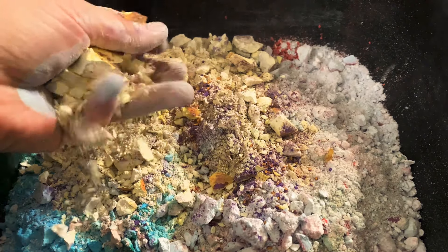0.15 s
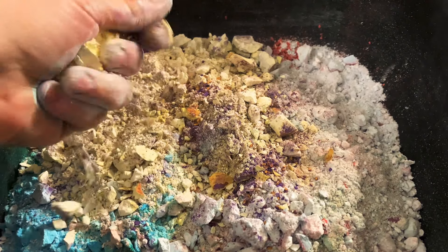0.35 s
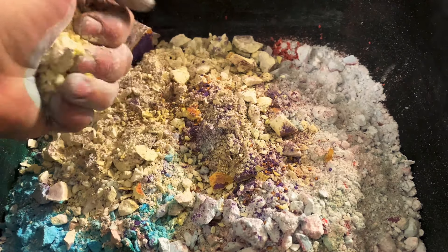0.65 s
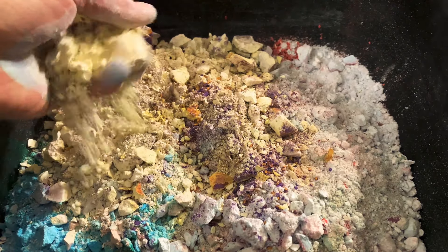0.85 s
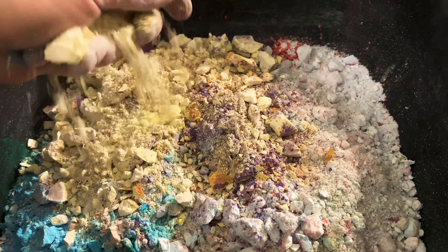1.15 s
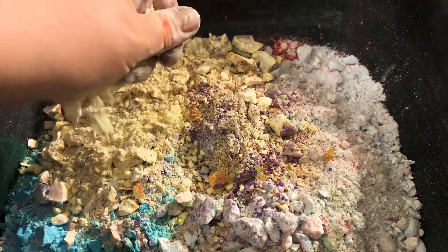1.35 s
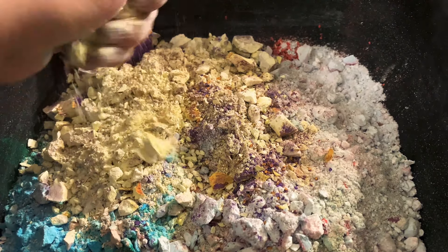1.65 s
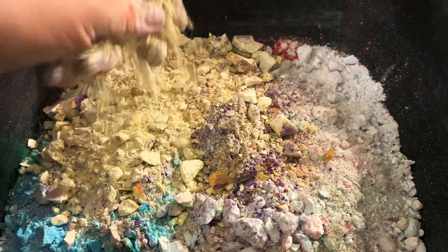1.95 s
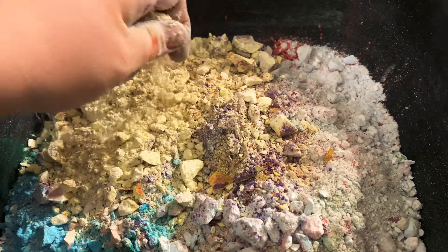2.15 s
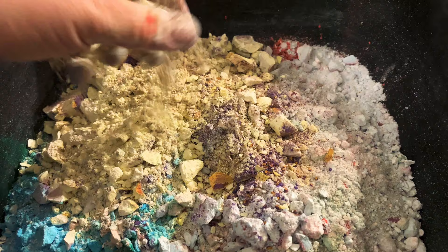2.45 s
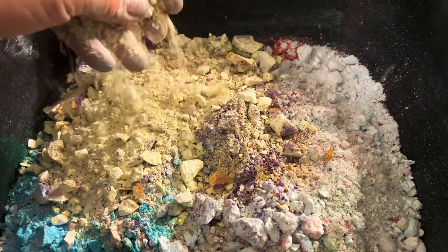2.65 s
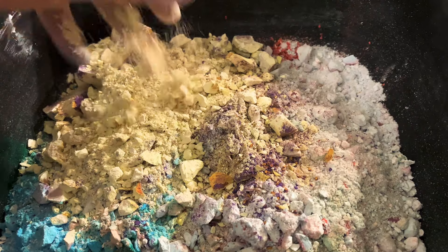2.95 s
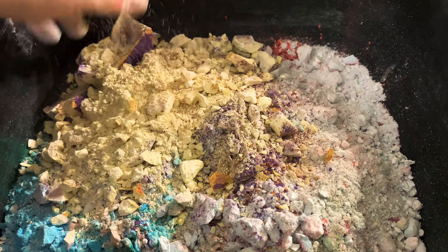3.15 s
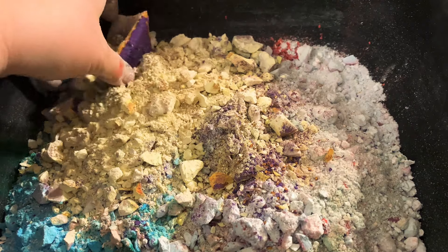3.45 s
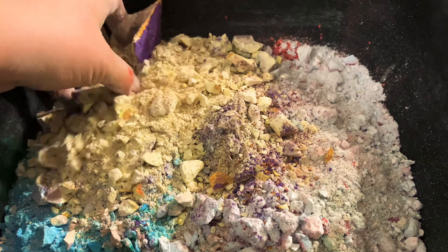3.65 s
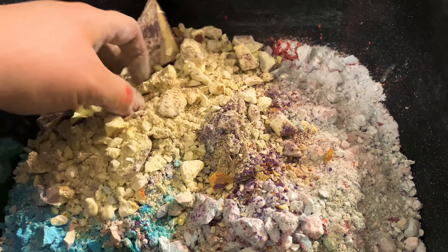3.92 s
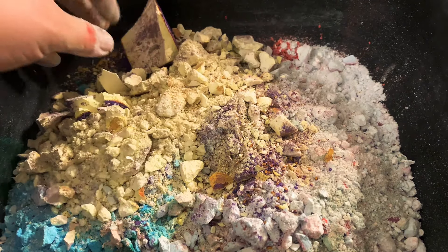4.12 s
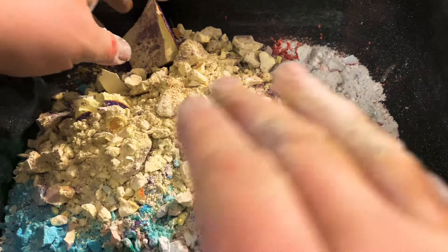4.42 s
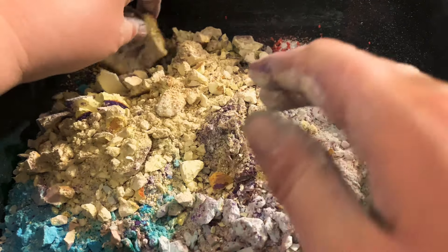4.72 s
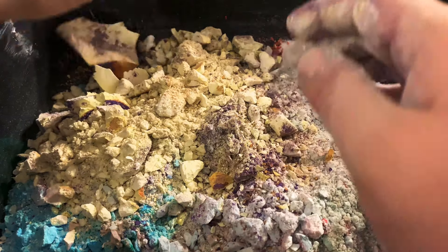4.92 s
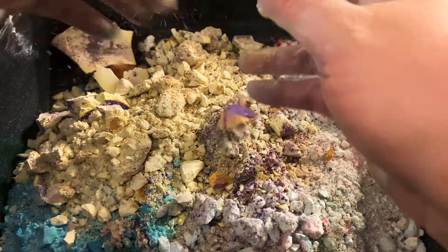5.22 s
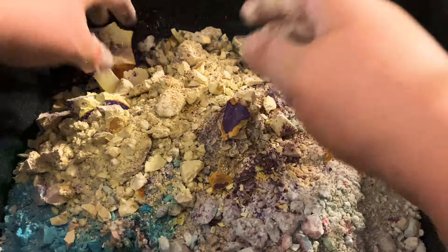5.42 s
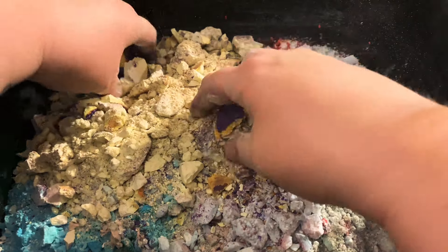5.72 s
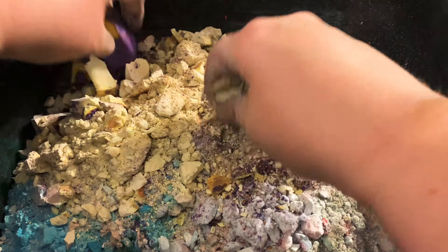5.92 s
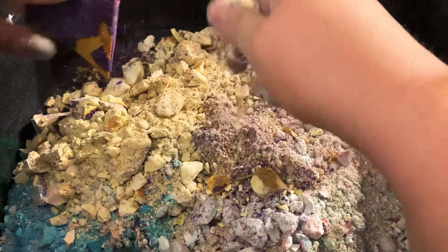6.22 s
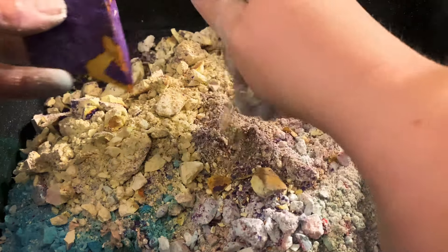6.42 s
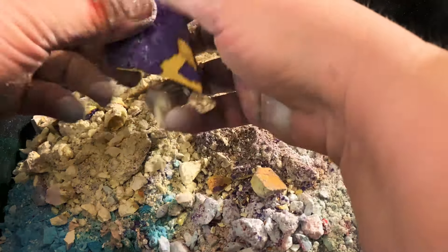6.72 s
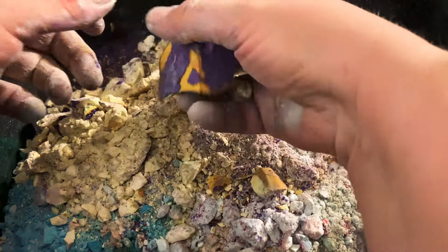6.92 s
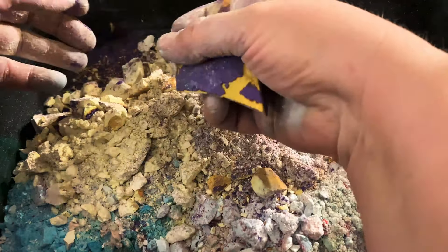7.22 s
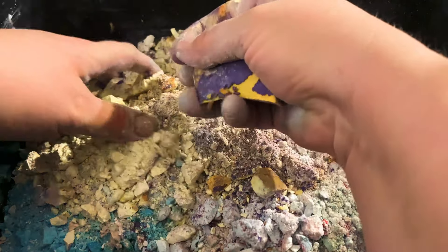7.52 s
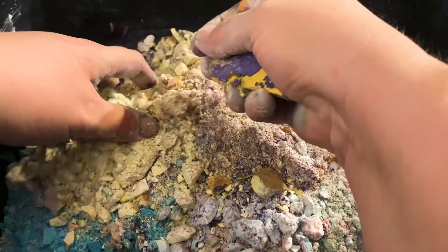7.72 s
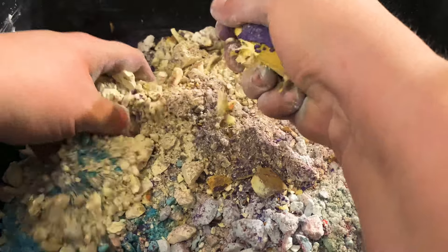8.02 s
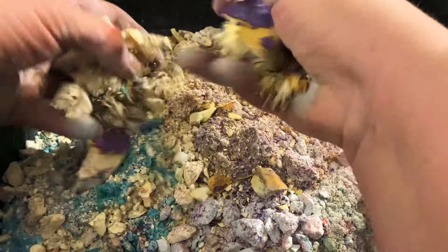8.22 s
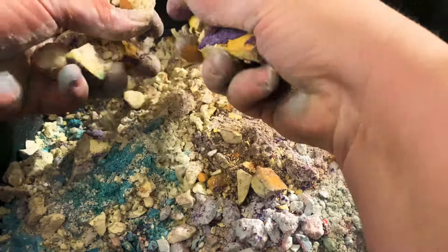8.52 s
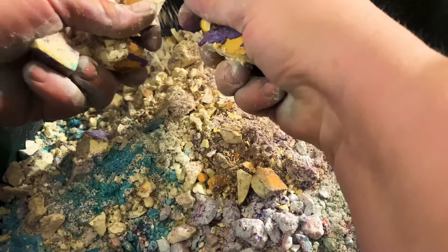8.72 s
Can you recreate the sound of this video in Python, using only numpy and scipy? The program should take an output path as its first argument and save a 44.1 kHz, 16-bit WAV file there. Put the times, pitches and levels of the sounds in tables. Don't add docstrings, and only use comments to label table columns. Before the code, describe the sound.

Two hands crush chalk over a heap of crumbs in a tray, heard very close and dry in stereo by a small recorder on the same table. Clusters of snaps and knocks alternate with softer gritty crumbling. Heavy thuds come near three and four seconds, then a quieter lull, scrapes, powder hiss and short squeaks, and finally hard breaking near the end. Low table rumble and faint mains hum lie beneath.

```python
import sys
import numpy as np
from scipy import signal
from scipy.fft import rfft, irfft, next_fast_len
from scipy.io import wavfile
from scipy.ndimage import uniform_filter1d, map_coordinates

SR = 44100
rng = np.random.default_rng(int(sys.argv[2]) if len(sys.argv) > 2 else 0)


def wrap_up_sound(samples):
    columns = np.atleast_2d(samples).T
    tamed = np.clip(columns, -1, 1)
    steps = np.round(tamed * 32767).astype(np.int16)
    wavfile.write(sys.argv[1], SR, steps)


def natural_amplitude(level_db):
    exponent = np.asarray(level_db, float) / 20
    return 10 ** exponent


N = 391166

# [f/Hz, level/dB rms]
MAINS_HUM = (119.8, -45)
# [f/Hz, likeness 0-1]
LIKENESS = [(30, 0.993), (70, 1), (150, 0.88), (290, 0.54), (640, 0.37), (3000, 0.56), (15000, 0.76)]

# [t/s, level/dB]
ROCKING = [
    (0, -27),
    (3.9, -28.5),
    (4.3, -10.5),
    (4.8, -16),
    (5.6, -23),
    (6.8, -18.5),
    (8.87, -21.5),
]
# [t/s, level/dB]
SHAKING = [(0, -23), (.5, -34.5), (1.45, -28), (1.95, -28), (2.4, -29.5), (3.255, -27.5), (3.27, -17),
           (3.95, -23), (4.55, -52), (4.65, -28.5), (5.44, -36), (5.47, -24.5), (6.0, -39.5), (6.9, -28.5),
           (7.35, -28), (7.58, -12), (7.69, -24.5), (8.87, -32.5)]
# [f/Hz, level/dB per Hz]
SWAY_COLOUR = [(1.5, -20), (4, 0.5), (16, -2), (26, -19), (70, -83)]
RUMBLE_COLOUR = [(15, -60), (28, -6.5), (42, -1.5), (80, -9), (110, -7.5), (200, -123)]
DRONE_COLOUR = [(50, -52), (80, -21), (110, -1.5), (145, -5), (190, -5), (250, -8.5), (325, -10.5),
                (430, -13), (700, -45.5)]
DRONE_DB, DRONE_DRAG = 1.9, 0.55

# [t/s, peak level/dB, f/Hz]
NUDGES = [(.255, -12.5, 89), (1.21, -17, 94), (1.326, -18, 127), (2.043, -13, 121), (3.044, -21, 105),
          (3.369, -13, 100), (3.66, -12, 60), (3.75, -15, 81), (4.073, -21, 67), (4.157, -19, 199),
          (5.432, -9.5, 120), (5.569, -11, 110), (6.07, -13.5, 50), (6.341, -14.5, 51.5), (6.537, -21, 94),
          (6.6, -19.5, 129.8), (6.79, -11, 65), (7.033, -11, 95.5), (7.069, -14, 84), (7.16, -15, 190),
          (7.511, -5, 101), (7.82, -10, 45), (7.955, -9, 70), (7.98, -13, 55), (8.085, -16, 60),
          (8.181, -17, 190), (8.214, -16, 200), (8.303, -16.5, 75), (8.457, -14, 132), (8.619, -8.5, 65.5)]
NUDGE_LAG_S, NUDGE_CYCLES = 0.00726, 4.2
# [t/s, peak level/dB, low mode level/dB, high mode level/dB, ringing 0-1.5]
LANDINGS = [(0.232, -12, -20, -0.5, 0.74), (1.415, -9.5, -9, -13, 0.28), (1.513, -8.5, -12, 14.5, 0.12),
            (1.671, -1.5, -19, 0, 0.22), (1.775, -9, -13, -21, 0.28), (2.927, -14.5, -22, -1, 0.53),
            (3.264, 4.5, -12, -20, 0.9), (3.471, -7.5, -9, -9, 1), (3.823, -2, -10, -14, 0.93),
            (3.931, 11.5, -22, -8, 0.86), (4.611, -12.5, -11, -12, 0.5), (4.74, -15, -5, 12, 0.31),
            (4.855, -1.5, -32, -12, 0.54), (4.885, -1, -12, 5.5, 1), (4.985, 1.5, -9, 0, 0.75),
            (5.461, 6, -9.5, -17, 0.86), (5.885, -13.5, 3, 16, 0.13), (6.846, -2.5, -16.5, -8, 0.57),
            (7.476, -11.5, -7, -7, 1), (7.572, -20, 2, -7, 0.85), (7.767, -13, -1.5, 10, 0.44),
            (8.702, -28, -24, -12, 0.3)]
# [f/Hz, time to fall 60 dB t/s]
TRAY_MODES = [(108, 0.23), (190, 0.12), (325, 0.06), (470, 0.061)]

# [t/s, length t/s, centre f/Hz, level/dB rms]
SIFTING = [(0.34, .07, 6000, -34), (0.45, 0.14, 4100, -35), (3.54, .04, 2900, -28), (5.647, .05, 6200, -38),
           (5.8, 0.062, 5200, -36), (6.612, .07, 5800, -39.5), (6.624, 0.055, 4600, -40),
           (8.7, .05, 5900, -33), (6.85, 0.042, 11600, -35), (6.902, .095, 7000, -27.5),
           (6.9, .095, 17000, -33), (6.1, 0.061, 6500, -42), (7.151, .05, 5700, -32),
           (7.246, 0.045, 5800, -28.5), (7.238, 0.22, 14500, -30), (7.299, 0.1, 3400, -34.5),
           (7.2, .235, 1100, -31.5), (8.43, .14, 15000, -40), (7.62, 0.12, 1300, -36.5),
           (7.3, 0.15, 520, -29)]
# [t/s, length t/s, first f/Hz, last f/Hz, level/dB rms]
SQUEAK_STROKES = [(0.47, 0.09, 4400, 4140, -44), (6.7, .04, 6840, 6600, -31),
                  (6.75, 0.055, 3030, 3330, -34), (6.86, .024, 6260, 6230, -22),
                  (6.862, 0.022, 2500, 2490, -34), (6.912, .08, 3590, 3660, -36),
                  (6.914, 0.065, 2470, 2330, -33), (6.9, 0.096, 6400, 7250, -32),
                  (7.059, 0.039, 4140, 4270, -38), (7.06, 0.088, 8200, 8150, -42),
                  (6.62, .06, 7000, 6700, -44), (6.99, 0.2, 5830, 5620, -44)]
# [t/s, length t/s, first f/Hz, last f/Hz, level/dB rms]
SCRAPE_STROKES = [
    (6.013, 0.18, 2040, 1950, -34),
    (6.195, 0.15, 2070, 1700, -35),
    (6.342, 0.11, 1700, 2100, -34.5),
]
SIFT_WIDTH, SQUEAK_WIDTH, SCRAPE_WIDTH = 0.22, 0.04, 0.11
STUTTER_DB = 3.5

# [t/s, bits per s]
CRUMBLING_RATE = [(0, 130), (.45, 100), (.5, 50), (.8, 80), (.9, 200), (3.05, 180), (3.3, 280), (4.9, 60),
                  (5.5, 280), (6.7, 150), (7.7, 220)]
# [t/s, effort level/dB, coarseness level/dB]
STEADY_WORK = [(0, -38, -2), (.19, -41.5, 2), (.38, -33, 0.5), (.83, -43.5, 2), (1.2, -40.5, 1.5),
               (1.35, -35.5, 0.5), (1.7, -41, 3), (2.8, -45.5, 0), (3.24, -61, 10), (3.4, -38, 9),
               (3.8, -33.5, 9.5), (4.0, -54, 8.5), (4.52, -60.5, 2.5), (4.66, -39, 0.5), (5.43, -53, 5),
               (5.47, -32.5, 5), (6.82, -40.5, -1.5), (8.87, -39.5, 3.5)]
# [t/s, half length t/s, depth level/dB]
PAUSES = [
    (6.825, .035, -6.5),
    (7.03, 0.04, -8),
    (5.08, 0.14, -9.5),
    (1.66, 0.042, -6.5),
    (6.2, .04, -4),
]
# [t/s, hold t/s, effort level/dB, coarseness level/dB]
PRESSES = [(.245, 0.14, -37.5, 3), (2.05, 0.096, -31.5, -3), (2.26, 0.079, -34, -11),
           (2.65, 0.032, -40, 3.5), (2.94, 0.1, -48, 8.5), (3.264, 0.046, -28.5, 11.5),
           (3.37, 0.025, -28.5, 7.5), (3.467, 0.014, -30.5, 8.5), (3.94, 0.0092, -49.5, 20),
           (4.088, 0.0065, -40.5, 6), (4.617, 0.011, -37, 15.5), (4.89, 0.0064, -56, 22),
           (4.945, 0.0046, -48, 14.5), (5.45, 0.012, -33, 9.5), (6.847, 0.0063, -30, 4),
           (7.162, 0.27, -31, 0.5), (7.515, 0.0061, -35, 7.5), (7.77, 0.18, -37, 1),
           (8.08, 0.058, -49.5, 18), (8.388, 0.014, -33.5, 3), (8.615, 0.022, -28, 0.5)]
# [t/s, hold t/s, effort level/dB, coarseness level/dB]
RAKING = [(1.42, 0.13, -35, 2.5), (1.88, 0.044, -42.5, 3), (2.41, 0.0077, -35, -21),
          (2.86, 0.006, -39.5, -25), (3.565, 0.005, -28, -18), (3.74, 0.029, -27, 5),
          (4.17, 0.056, -38.5, 4), (4.75, 0.064, -43.5, 11), (5.12, 0.016, -47.5, -30),
          (5.67, 0.011, -24.5, -1), (5.76, 0.05, -38, 13), (6.09, 0.022, -34, -5), (6.208, 0.023, -26, -12),
          (6.42, 0.0072, -30, -25), (6.63, 0.13, -40, -4), (6.92, 0.055, -32, -31),
          (7.075, 0.013, -38.5, -25), (7.59, 0.0088, -46, 4), (7.72, 0.061, -43, 12),
          (8.205, 0.017, -32, -5), (8.47, 0.082, -27, -13), (8.83, 0.045, -45, -2)]
PRESS_RISE, PRESS_FALL, RAKE_RISE, RAKE_FALL = 3700, 420, 420, 540
CRUMBS_DB, CRUMBS_GAIN, POWDER_DB, POWDER_LOSS = 1.12, 1.07, -0.5, 0.19
# [f/Hz, level/dB per Hz]
CRUMBS_COLOUR = [(250, -120), (330, -10.5), (480, 1), (700, -2), (850, 4.5), (1050, -5.5), (1500, -7),
                 (2200, -13.5), (4000, -50)]
GRIT_COLOUR = [(700, -53), (1100, -10), (1600, -10.5), (3000, -8), (5500, -12.5), (7500, -70), (12000, -60)]
POWDER_COLOUR = [(2500, -43), (4200, -15), (5800, -6), (9000, -7), (16000, -14)]

# [t/s, peak level/dB, f/Hz]
FLYING_CHIPS = [(0.242, -7, 870), (0.263, -4, 1260), (1.068, -7.5, 797), (1.229, -16, 795),
                (1.284, -11, 947), (1.345, -12, 2730), (1.358, -10, 1290), (1.381, -7, 650),
                (2.046, -4, 1410), (2.063, -0.5, 1420), (2.257, 0.5, 1530), (2.286, -12, 1380),
                (3.871, -5, 760), (3.893, -1.5, 780), (4.857, -1.5, 840), (4.884, 3, 786),
                (6.074, -3, 1790), (7.574, 8, 2700), (7.595, -5, 2190), (7.77, -1, 580), (7.821, -4, 883),
                (7.867, 2, 1850), (8.073, -4, 1860), (8.102, -13.5, 812.5), (8.126, -11, 805),
                (8.393, 0.5, 930), (8.593, 1, 1330), (8.62, -1, 1370)]
CHIP_DB, CHIP_CYCLES = -6, 19
# [t/s, peak level/dB, dull part level/dB]
SMALL_CRACKS = [(0.0438, -21, -2), (0.081, -14.5, -3), (0.1186, -25, -2), (0.1585, -22, -5),
                (0.2089, -18, -4), (0.2952, -17, -5), (0.3795, -20, -4), (0.4823, -21, -3),
                (0.7472, -19, 1), (0.836, -24, -4), (0.959, -19, -3), (1.1937, -31, -4), (1.2086, -14, -4),
                (1.256, -15, -4), (1.8063, -26, -4), (1.8417, -24, -4), (1.8806, -24, -4),
                (1.8976, -16.5, -4), (2.4992, -25, -4), (2.585, -16, -2), (2.6356, -18.5, -4),
                (2.7202, -21, -6), (2.913, -16, -3), (2.9585, -15, -4), (3.043, -19, 0), (3.2742, -6, -2),
                (3.3164, -15, -2), (3.3533, -27, -2), (3.4904, -12, -4), (3.6494, -18, -2),
                (3.752, -11, -4), (4.698, -26, 0), (4.941, -25, -4), (4.9646, -27, -6), (5.1781, -36, -4),
                (5.2364, -22, -4), (5.2474, -28, -4), (5.3243, -33, -4), (5.6582, -10, -4),
                (5.7299, -21, -2), (6.0182, -16, -10), (6.3634, -16, -6), (6.53, -20, -2),
                (6.6757, -24, -4), (6.8094, -27, -4), (7.7804, -9, -5), (7.8994, -19, 1), (7.9527, -11, -4),
                (7.9936, -12, -3), (8.0814, -13, -4), (8.1803, -20, -4), (8.2733, -16.5, -2),
                (8.3245, -21, 1), (8.3414, -20, -4), (8.4687, -13, -3), (8.842, -8.5, -3)]
CRACK_DB, CRACK_BRIGHT_DB = -2.5, -12
# [t/s, peak level/dB, brightness level/dB]
THIN_FLAKES = [(0.236, -14, -2), (0.346, -9, 8), (0.9117, -17.5, 2), (1.0119, -15, 23), (1.1467, -16.5, 22),
               (1.1766, -22, 14), (1.355, -1.5, 17), (1.396, -1.5, 23), (1.6718, -13, 4), (1.759, -23, 16),
               (1.8205, -21, -15), (2.1055, -3, 21), (2.861, -13, 17), (5.4432, -17, -1), (6.462, -18, -7),
               (6.75, -16, -8), (6.793, -10, 30), (6.87, -16, 20), (7.011, -15.5, 19), (8.042, -14, 5),
               (8.6148, -14, 8), (8.6262, 2.5, 27)]
FLAKE_DULL_DB = -19
# [t/s, peak level/dB, dull part level/dB, brightness level/dB]
CHUNK_KNOCKS = [(.093, -15, 0.5, -12), (.426, -11.5, -0.5, -23), (1.069, -8.5, -3, -10),
                (1.1206, -19.5, 2.5, 1), (1.2298, -11.5, -0.5, 2), (1.322, -15, -4, 1),
                (1.382, -6, 3.5, 14), (1.444, -9, 2, -23), (1.5166, -7.5, -0.5, 8), (2.089, -5, -4.5, -11),
                (3.0064, -9.5, -0.5, -19), (3.8706, -25, 18, -25), (3.894, -26, 18, -25),
                (3.9319, -23, 24, -13), (4.8578, -14.5, 8.5, 9), (4.884, -15.5, 14, 6),
                (4.9814, -26, 9, -3), (5.4648, -3.5, 3, -0.5), (6.0743, -13.5, 2, -17), (6.849, -9, 2, -4),
                (7.772, 3.5, -6, -1.5), (7.8229, -1.5, -5, 1), (7.842, -21, 16.5, -18),
                (7.959, -16, 0.5, 0), (8.1034, -24, 14.5, -25), (8.128, -28, 20, -21), (7.559, -24, 4, -20),
                (7.806, -19, 0, -8), (8.056, -18, 2, -16), (8.377, -19, 2, -14), (8.394, -18, 18, -14),
                (8.7066, -21.5, 15.5, -22)]
# [t/s, peak level/dB, dull part level/dB, brightness level/dB]
CHUNK_BREAKS = [(.243, 0.5, -5, -4.5), (0.2647, -4, -3.5, 1), (1.2858, -2, -7.5, 1), (1.337, -6, -17, -9),
                (1.3466, -4, -25, -19.5), (1.3597, -4, -25, -6), (1.3854, -4.5, -16, -12),
                (2.047, -8, -3, 3), (2.0639, 1, -9.5, 30), (2.242, -7, -16, -1), (2.2582, -5, -1, -5),
                (2.287, -4.5, -13, 2), (2.9325, -14, -4.5, -8), (3.5596, -10.5, 4, -16),
                (5.22, -18, -10, -15), (5.9405, -8, -18, -13), (6.1046, -8.5, -17, -2),
                (7.5743, 1.5, -11.5, -7), (7.5963, -10, -16, -5), (7.8677, -0.5, -14, -23),
                (7.8796, -8, -24, -20), (7.971, -10, -8, 2), (8.0096, -10.5, -6, 1),
                (8.0746, -0.5, -16, -6.5), (8.092, -15, -12, -5), (8.5942, -1, -10, -7),
                (8.6219, -2.5, -0.5, 2.5), (8.815, -6, -10, -17)]
# [f/Hz, time to fall 60 dB t/s, level/dB over the dull part]
TRAY_WALL = (800, 0.019, -9.5)
TOP_HZ = 15750


def unit(x):
    return x / np.sqrt(np.mean(x ** 2) + 1e-20)


def along(points, hz):
    f, value = np.transpose(points)
    return np.interp(np.log(hz + 1), np.log(f + 1), value)


def curves(rows):
    s, *columns = np.transpose(rows)
    return [np.interp(np.arange(N) / SR, s, column) for column in columns]


def wobble(rate):
    knots = rng.standard_normal(int(N * rate / SR) + 4)
    return map_coordinates(knots, [np.arange(N) * rate / SR])


def coloured(pair, spectrum):
    m = next_fast_len(N + 8192)
    hz = np.fft.rfftfreq(m, 1 / SR)
    turn = np.arccos(np.clip(along(LIKENESS, hz), -1, 1)) / 2
    gains = natural_amplitude(along(spectrum, hz)) * [np.cos(turn), np.sin(turn)]
    mid, side = irfft(rfft(pair, m) * gains, m)[:, :N]
    return unit(np.array([mid + side, mid - side]))


def hum():
    hz, level_db = MAINS_HUM
    return np.sqrt(2) * natural_amplitude(level_db) * np.sin(2 * np.pi * hz * np.arange(N) / SR)


def table(crumbs_db):
    rocking_db, = curves(ROCKING)
    rumble_db, = curves(SHAKING)
    sway = coloured(rng.standard_normal((2, N)), SWAY_COLOUR)
    rumble = coloured(natural_amplitude(2.9 * wobble(14)) * rng.standard_normal((2, N)), RUMBLE_COLOUR)
    drone_flutter = natural_amplitude(3.95 * wobble(28) + 1.3 * wobble(7.8))
    drone = coloured(drone_flutter * rng.standard_normal((2, N)), DRONE_COLOUR)
    drone_db = DRONE_DB + DRONE_DRAG * crumbs_db + (1 - DRONE_DRAG) * rumble_db
    return natural_amplitude(rocking_db) * sway + natural_amplitude(rumble_db) * rumble + natural_amplitude(drone_db) * drone


def short_rings(rows, cycles):
    out, t = np.zeros(N + SR), np.arange(SR // 8) / SR
    for s, db, hz in rows:
        fade = natural_amplitude(db - 60 * t * hz / cycles)
        onset = 1 - np.exp(-4 * t * hz)
        out[round(s * SR):][:len(t)] -= fade * np.sin(2 * np.pi * hz * t) * onset
    return out[:N]


def nudges():
    return short_rings([(s + NUDGE_LAG_S, db + 7.0, hz) for s, db, hz in NUDGES], NUDGE_CYCLES)


def thuds():
    out, t = np.zeros(N + SR), np.arange(SR // 4) / SR
    for s, db, low_db, high_db, ringing in LANDINGS:
        levels_db = (low_db + 3.5, -4, high_db - 0.5, high_db - 11.5)
        ring = np.zeros(len(t))
        for (hz, t60), level_db in zip(TRAY_MODES, levels_db):
            ring += natural_amplitude(level_db - 60 * t / (t60 * max(ringing, 0.1))) * np.sin(2 * np.pi * hz * t)
        push = 1.9 * max(1 - ringing, 0) * natural_amplitude(-60 * t / 0.012) * np.sin(2 * np.pi * 270 * t)
        blow = ring * (1 - np.exp(-t / 0.0024)) + push * (1 - np.exp(-t / 0.0013))
        out[round(s * SR):][:len(t)] += natural_amplitude(db + 1.5) * blow
    return out[:N]


def friction(strokes, width, stutter_db):
    out, slips = np.zeros((2, N + SR)), natural_amplitude(stutter_db * wobble(130))
    for s, length, first_hz, last_hz, db in strokes:
        count = round(length * SR)
        band = signal.butter(2, width * first_hz, fs=SR, output="sos")
        slow = signal.sosfilt(band, rng.standard_normal((4, SR // 4)))[:, -count:]
        turns = np.cumsum(np.linspace(first_hz, last_hz, count)) / SR
        mid, side = np.real((slow[:2] + 1j * slow[2:]) * np.exp(2j * np.pi * turns))
        swell = natural_amplitude(db) * np.sqrt(np.hanning(count))
        out[:, round(s * SR):][:, :count] += swell * unit(np.array([mid + 0.23 * side, mid - 0.23 * side]))
    return out[:, :N] * unit(slips)


def sifting():
    strokes = [(s, length, hz, hz, db) for s, length, hz, db in SIFTING]
    return friction(strokes, SIFT_WIDTH, stutter_db=2.0)


def squeaks_and_scrapes():
    squeaks = friction(SQUEAK_STROKES, SQUEAK_WIDTH, STUTTER_DB)
    return squeaks + friction(SCRAPE_STROKES, SCRAPE_WIDTH, STUTTER_DB)


def heap():
    t = np.arange(0, N + 64, 64) / SR

    def powers(db, coarse):
        crumbs_db = db + CRUMBS_DB + CRUMBS_GAIN * coarse
        powder_db = db + POWDER_DB - POWDER_LOSS * coarse
        return natural_amplitude(2 * np.array([crumbs_db, db, powder_db]))

    sample = np.minimum((t * SR).astype(int), N - 1)
    power = powers(*[curve[sample] for curve in curves(STEADY_WORK)])
    power *= natural_amplitude(2 * sum(db * np.exp(-((t - s) / half) ** 2) for s, half, db in PAUSES))
    for rows, rise, fall in ((PRESSES, PRESS_RISE, PRESS_FALL), (RAKING, RAKE_RISE, RAKE_FALL)):
        for s, hold, db, coarse in rows:
            drop_db = rise * np.maximum(s - t, 0) + fall * np.maximum(t - s - hold, 0)
            power += powers(db - drop_db, coarse)
    return [np.interp(np.arange(N) / SR, t, 10 * np.log10(p)) for p in power]


def grains(per_s, spread_db, life_s):
    chance, size = rng.random(N), rng.exponential(1, N)
    starts = (chance < per_s / SR) * natural_amplitude(2 * spread_db * np.minimum(size, 4))
    power = signal.lfilter([1], [1, -np.exp(-1 / (life_s * SR))], starts)
    return unit(np.sqrt(np.abs(power)))


def patchy(depth_db):
    z = signal.stft(rng.standard_normal((2, N)), nperseg=256)[2]
    field = uniform_filter1d(rng.standard_normal(z.shape[1:]), size=14, axis=1)
    field = uniform_filter1d(field, size=6, axis=0)
    return signal.istft(z * natural_amplitude(depth_db * unit(field)), nperseg=256)[1][:, :N]


def grinding(levels_db):
    shared = grains(per_s=360, spread_db=-2.5, life_s=0.0043)
    clumps = np.log(grains(per_s=30, spread_db=1.5, life_s=0.008) + 0.3)
    clumps = unit(clumps - clumps.mean())
    total = np.zeros((2, N))
    colours = (CRUMBS_COLOUR, GRIT_COLOUR, POWDER_COLOUR)
    crackle_shares, clumps_db = (0.45, 0.5, 0.4), (1.5, 1.4, 1.3)
    for level_db, colour, share, clump_db in zip(levels_db, colours, crackle_shares, clumps_db):
        crackle = 2.0 * shared + 0.083 * grains(per_s=54, spread_db=-11.0, life_s=0.0016)
        envelope = (1 - share + share * crackle) * natural_amplitude(clump_db * clumps + 0.6 * wobble(25))
        total += natural_amplitude(level_db - 2.5) * coloured(envelope * patchy(depth_db=2.6), colour)
    return total


def bits(grit_db):
    count, length = 2600, 400
    draw, t = rng.random((count, 4)), np.arange(length) / SR
    start = (draw[:, 0] * (N - length)).astype(int)
    keep = draw[:, 1] < curves(CRUMBLING_RATE)[0][start] * N / SR / count
    size = keep * natural_amplitude(grit_db[start] + 8 - 3.5 * np.log(np.maximum(draw[:, 2], 0.05)))
    hz = 500 * 9 ** draw[:, 3:]
    ring = np.sin(2 * np.pi * hz * t) * natural_amplitude(-60 * t * hz / 5)
    tick = 0.25 * rng.standard_normal((count, length)) * natural_amplitude(-60 * t / 0.004)
    where = (start[:, None] + np.arange(length)).ravel()
    return np.bincount(where, (size[:, None] * (ring + tick)).ravel(), N)


def chips():
    return short_rings([(s, db + CHIP_DB, hz) for s, db, hz in FLYING_CHIPS], CHIP_CYCLES)


def spread(x):
    m = next_fast_len(N + 8192)
    hz = np.fft.rfftfreq(m, 1 / SR)
    side = natural_amplitude(-14) * irfft(rfft(x, m) * 1j * hz ** 2 / (hz ** 2 + 90 ** 2), m)[:N]
    return np.array([x + side, x - side])


def burst(t, lo_hz, hi_hz, t60):
    band = signal.butter(2, [lo_hz, hi_hz], "bandpass", fs=SR, output="sos")
    force = rng.standard_normal(len(t)) * natural_amplitude(-60 * t / t60)
    force[0] = -7
    puff = signal.sosfilt(band, force)
    return puff / np.max(np.abs(puff))


def snaps(rows):
    out, t = np.zeros((2, N + SR)), np.arange(SR // 16) / SR
    wall_hz, wall_t60, wall_db = TRAY_WALL
    for s, db, dull_db, bright_db in rows:
        long = natural_amplitude(0.094 * (db + 11.0) + np.clip(rng.normal(0, 2.4), -4, 2))
        lift_db, cut_db = max(bright_db, 0), min(bright_db, 0)
        dull = natural_amplitude(dull_db) * burst(t, 261, 1016, 0.013 * long)
        body = natural_amplitude(-1.0 - lift_db) * burst(t, 980, 3640, 0.0092 * long)
        crack = natural_amplitude(cut_db) * burst(t, 2840, 8000, 0.014 * long)
        spit = natural_amplitude(cut_db - 4.5) * burst(t, 5600, 16300, 0.018 * long)
        scatter = natural_amplitude(-18.0) * burst(t, 500, 7000, 0.064)
        chip_hz = 900 * natural_amplitude(rng.uniform(0, 14.25, (3, 1)))
        ring_fade = natural_amplitude(-13.5 - lift_db - 60 * t / (0.0086 * long))
        ring = ring_fade * np.sin(2 * np.pi * chip_hz * t).sum(axis=0)
        wall_fade = natural_amplitude(dull_db + wall_db + rng.normal(0, 1.5) - 60 * t / wall_t60)
        hollow = wall_fade * np.sin(2 * np.pi * wall_hz * natural_amplitude(rng.normal(0, 0.79)) * t)
        mid = dull + hollow + body + crack + spit + ring
        out[:, round(s * SR):][:, :len(t)] += natural_amplitude(db + 0.28) * np.array([mid + scatter, mid - scatter])
    return out[:, :N]


def fractures():
    cracks = [(s, db + CRACK_DB, dull_db, CRACK_BRIGHT_DB) for s, db, dull_db in SMALL_CRACKS]
    flakes = [(s, db, FLAKE_DULL_DB, bright_db) for s, db, bright_db in THIN_FLAKES]
    return snaps([*cracks, *flakes, *CHUNK_KNOCKS, *CHUNK_BREAKS])


def scene():
    levels_db = heap()
    crumbs_db, grit_db, _ = levels_db
    background = hum() + table(crumbs_db)
    ringing = spread(nudges() + thuds() + chips())
    rubbing = sifting() + squeaks_and_scrapes()
    return background + ringing + rubbing + grinding(levels_db) + bits(grit_db) + fractures()


def band_limit(x):
    return signal.sosfilt(signal.butter(12, 16460, fs=SR, output="sos"), x)


def record(dry):
    flat = dry / (1 + np.abs(dry / 0.95) ** 6) ** (1 / 6)
    m = next_fast_len(N)
    passed = np.fft.rfftfreq(m, 1 / SR) < TOP_HZ
    limited = irfft(rfft(flat, m) * passed, m)[:, :N]
    return band_limit(limited)


dry = scene()
out = record(dry)
wrap_up_sound(out)
```